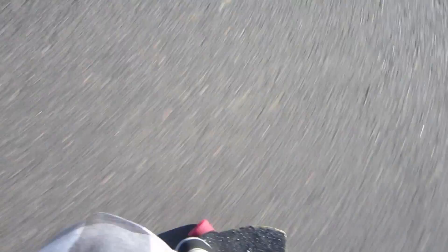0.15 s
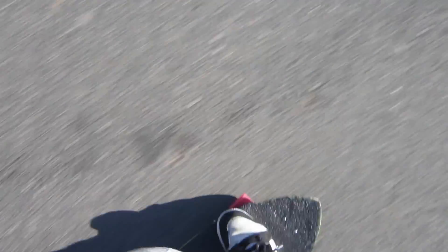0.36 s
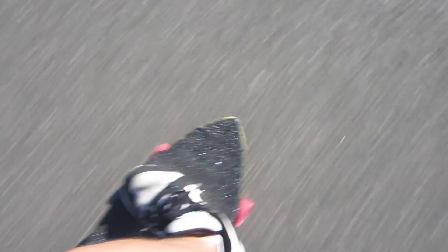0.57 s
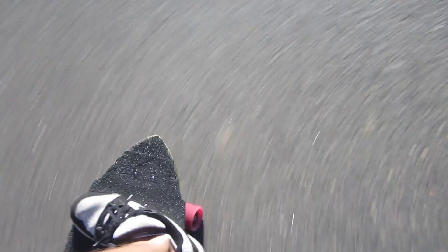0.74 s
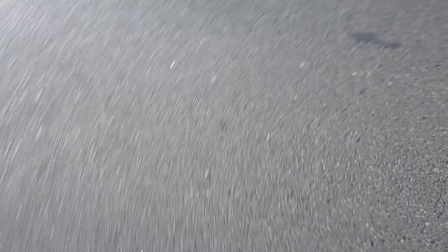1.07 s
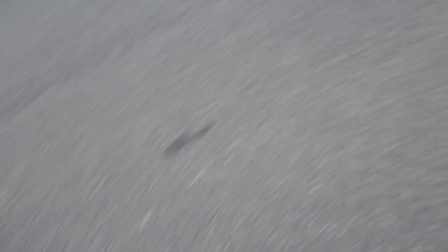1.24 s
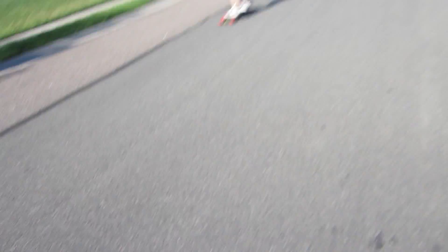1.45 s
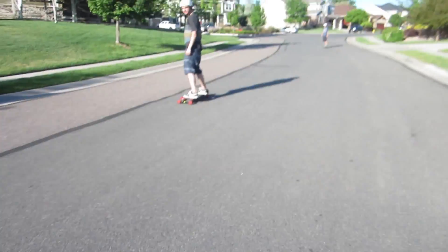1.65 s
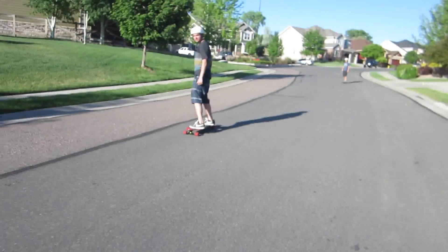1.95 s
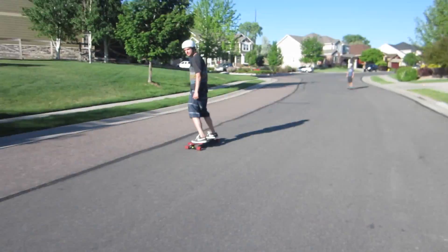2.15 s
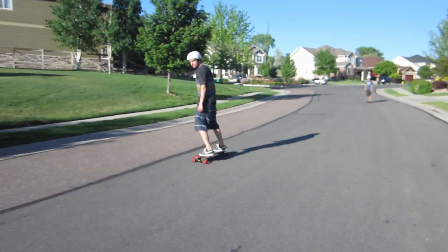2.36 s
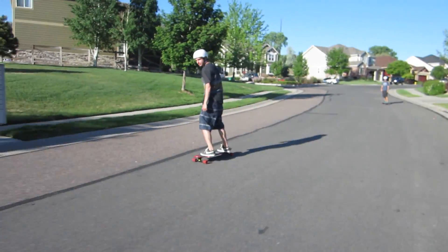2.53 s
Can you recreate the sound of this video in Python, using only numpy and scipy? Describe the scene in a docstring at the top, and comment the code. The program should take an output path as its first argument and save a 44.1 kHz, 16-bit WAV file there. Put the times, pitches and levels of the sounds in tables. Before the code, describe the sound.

Longboard wheels rumble and clatter close over rough asphalt, then roll on quieter and farther away

```python
"""Rough asphalt, outdoors: a longboard carves just under the microphone of a hand-held camera. Random stone
impacts ring wheels and deck, and filtered grit impacts crackle as the wheels scrub sideways. The carve ends at
about 1.2 s; the rolling goes on quieter and farther off, as coloured impacts and hiss. Enveloped tones and
noise make bumps, ticks, creaks, small rattles, a soft rub and a faint high trill. Low noise gusts buffet the
microphone, and short tonal thumps knock the camera housing."""
import sys
import numpy as np
from scipy import signal
from scipy.fft import rfft, irfft
from scipy.io import wavfile
from scipy.ndimage import uniform_filter1d

SR = 44100
rng = np.random.default_rng(int(sys.argv[2]) if len(sys.argv) > 2 else 0)


def transcribe(signal):
    """Save signal, clipped to [-1, 1], as a 16-bit WAV file at the path in sys.argv[1]."""
    frames = np.atleast_2d(signal).T
    limited = np.clip(frames, -1, 1)
    pcm = np.round(limited * 32767).astype(np.int16)
    wavfile.write(sys.argv[1], SR, pcm)


N = 119070  # 2.7 s


def undb(db):
    """Decibels to gain."""
    return 10 ** (np.asarray(db) / 20)


def unit(x):
    """Scale to rms 1."""
    return x / np.sqrt(np.mean(x ** 2))


def seconds():
    """Time of every sample."""
    return np.arange(N) / SR


def curve(rows, axis=1):
    """Gain over time, drawn straight in dB between the points of one column."""
    rows = np.array(rows)
    return undb(np.interp(seconds(), rows[:, 0], rows[:, axis]))


def colour(x, points):
    """Causal minimum-phase filter with the given spectrum, built by folding its cepstrum."""
    hz, db = np.array(points).T
    size = 4096
    f = np.maximum(np.arange(size // 2 + 1) * SR / size, 1)
    gain = undb(np.interp(np.log(f), np.log(hz), db))
    cepstrum = irfft(np.log(gain))
    cepstrum[1:size // 2] *= 2
    cepstrum[size // 2 + 1:] = 0
    response = irfft(np.exp(rfft(cepstrum)))
    return signal.fftconvolve(x, response)[:len(x)]


def ring(x, modes):
    """Sum of resonances, neighbours in opposite phase."""
    out = np.zeros(len(x))
    for k, (hz, width_hz, db) in enumerate(modes):
        b, a = signal.iirpeak(hz, hz / width_hz, SR)
        out += (-1) ** k * undb(db) * signal.lfilter(b, a, x)
    return out


def walk(rate):
    """Smooth random motion with spread 1, from noise averaged twice over 1/rate seconds."""
    k = max(int(SR / rate), 1)
    return unit(uniform_filter1d(uniform_filter1d(rng.standard_normal(N), k), k))


def impacts(rate, spread_db):
    """Random tiny impacts of either sign, a few larger than the rest."""
    hit = rng.random(N) < rate / SR
    size = undb(spread_db * np.minimum(rng.exponential(size=N), 2 * np.e))
    return hit * size * np.sign(rng.standard_normal(N))


def steady(x, size=1800):
    """Hold the slow level of a vibration at rms 1, keeping its fast grain (size in samples)."""
    power = np.abs(uniform_filter1d(uniform_filter1d(x ** 2, size), size))
    return x / np.sqrt(power + 1e-18)


def band(x, lo_hz, hi_hz):
    """Keep one band."""
    return signal.sosfilt(signal.butter(2, [lo_hz, hi_hz], "band", fs=SR, output="sos"), x)


def bursts(rows, points):
    """Short noise crackles that start at once and die away exponentially."""
    t = seconds()
    env = sum(undb(db) * (t >= s) * np.exp(-np.abs(t - s) / decay) for s, db, decay in rows)
    noise = rng.standard_normal(N)
    return colour(noise * env, points) / np.std(colour(noise, points))


def narrow(hz, width_hz):
    """Noise in one resonance whose centre may move: slow noise carried on a tone."""
    lowpass = signal.butter(2, width_hz / 2, fs=SR, output="sos")
    slow = signal.sosfilt(lowpass, rng.standard_normal((2, N)))
    phase = 2 * np.pi * np.cumsum(hz * np.ones(N)) / SR
    return unit(slow[0] * np.cos(phase) + slow[1] * np.sin(phase))


def knocks(rows):
    """Each blow is a tone that swells and dies within a few cycles."""
    out, t = np.zeros(N), np.arange(SR // 10) / SR
    for s, db, hz, rise in rows:
        i = int(s * SR)
        swell = (t / rise * np.exp(1 - t / rise)) ** 2
        out[i:i + len(t)] += undb(db) * swell * np.sin(2 * np.pi * hz * t)
    return out


STONES_PER_S, STONE_SPREAD_DB = 1600, 1


def road(judder):
    """Stones in the asphalt strike at random, their force shaken by the judder of the contact."""
    return impacts(STONES_PER_S, STONE_SPREAD_DB) * judder


# resonances of wheels and trucks: pitch_hz [Hz], width_hz [Hz], relative_db [dB]
WHEEL_MODES = [(532.4, 33.6, 0.5), (597, 83, -4.5), (667, 115, -7.5), (790, 103, -9.5), (932, 91, -14),
               (1073, 55, -14), (1190, 150, -21), (1540, 90, -20)]
# broad spectrum of the wheel roar: pitch_hz [Hz], relative_db [dB per Hz]
WHEEL_ROAR_COLOUR = [(100, -50.5), (330, -13.5), (500, 6), (700, -1), (950, -11.5), (1300, -28.5),
                     (1800, -26), (3000, -46), (8000, -65), (16000, -83)]
# roar against the narrow resonances: time_s [s], relative_db [dB]
ROAR_SHARE = [(0, 11), (.6, -2.5), (1.15, -1.5)]


def wheels(judder):
    """Stones excite narrow wheel and truck resonances and a broad roar, together held at rms 1."""
    rings = band(ring(road(judder), WHEEL_MODES), 438, 1255)
    roar = colour(road(judder), WHEEL_ROAR_COLOUR)
    return steady(unit(rings) + curve(ROAR_SHARE) * unit(roar), size=700)


# resonances of the deck: pitch_hz [Hz], width_hz [Hz], relative_db [dB]
DECK_MODES = [(191, 225, -8), (260, 24.6, 5), (308, 17.6, -1), (408.4, 40, -1)]


def deck(judder):
    """Stones drum the low resonances of the deck, held at rms 1."""
    return steady(band(ring(road(judder), DECK_MODES), 150, 700))


# spectrum of grit under the wheels: pitch_hz [Hz], relative_db [dB per Hz]
GRIT_COLOUR = [(400, -36), (1200, 10), (1800, -5.5), (2400, 6.5), (3000, -2.5), (3600, 4), (4200, -5.5),
               (4700, 2), (5500, -4.5), (6600, 0.5), (8500, -3.5), (12800, -8.5), (15500, -21)]
GRIT_PER_S, GRIT_SPREAD_DB, GRIT_FLICKER_DB = 17000, 4, 2.8


def grit():
    """Dense, flickering grit impacts crackle at rms 1."""
    flicker = undb(GRIT_FLICKER_DB * walk(150))
    return steady(colour(impacts(GRIT_PER_S, GRIT_SPREAD_DB) * flicker, GRIT_COLOUR), size=900)


# rolling just under the microphone: time_s [s], wheel_level_db [dB], deck_level_db [dB]
CLOSE_LEVELS = [(0.0, -33.5, -29), (0.142, -29, -32.5), (0.168, -26.5, -27), (0.552, -27, -26),
                (0.564, -22, -26.5), (0.604, -25, -24), (0.632, -25.5, -34), (0.682, -19, -24),
                (0.735, -24, -26), (0.765, -19.5, -26.5), (0.848, -18.5, -25.5), (0.858, -25.5, -22),
                (0.88, -17.5, -30.5), (0.91, -25, -30.5), (0.957, -17.5, -30), (0.979, -27, -36),
                (1.0, -21.5, -37.5), (1.036, -24.5, -39), (1.1, -22.5, -44.5), (1.135, -23.5, -44),
                (1.149, -35.5, -59), (1.166, -30, -37), (1.202, -51, -54), (1.22, -50, -46.5)]
# sideways scrub of the wheels: time_s [s], level_db [dB]
SCRUB_LEVELS = [(0, -60), (.5, -58.5), (.58, -46), (.67, -40.5), (.76, -38.5), (.82, -33.5), (.89, -37.5),
                (.93, -39.5), (1.05, -44.5), (1.13, -42), (1.17, -50), (1.2, -63)]
JUDDER_HZ, JUDDER_DB = 73.5, 2  # averaging rate and spread of the random judder


def close_board():
    """Wheels, deck and scrubbed grit close by, faded out after the carve."""
    judder = undb(JUDDER_DB * walk(JUDDER_HZ))
    rolling = wheels(judder) * curve(CLOSE_LEVELS) + deck(judder) * curve(CLOSE_LEVELS, axis=2)
    scrub = grit() * curve(SCRUB_LEVELS)
    carving = np.clip((CLOSE_LEVELS[-1][0] - seconds()) / 0.057 + 1, 0, 1)
    return carving * (rolling + scrub)


# wheels strike larger stones: start_s [s], peak_db [dB], pitch_hz [Hz], rise_s [s]
BUMPS = [(.174, -16.5, 510, 0.0054), (.288, -19, 325, 0.0021), (.334, -17.5, 482, 0.0072),
         (.358, -11.5, 407, 0.0013), (.447, -15, 260, 0.0028), (.455, -16, 360, 0.004),
         (.562, -19, 536, 0.0039), (.635, -13.5, 590, 0.0023), (.659, -16, 547, 0.0087),
         (.747, -14, 605, .004), (.818, -21, 560, 0.0036), (.84, -20, 608, 0.0045),
         (.897, -11.5, 507, 0.0015), (.914, -7.5, 580, 0.0022), (.921, -7.5, 575, 0.0015),
         (.9645, -6.5, 785, 0.0014), (.984, -16.5, 599, 0.0046), (1.028, -17, 690, 0.0026),
         (1.068, -12.5, 603, 0.002), (1.115, -13.5, 600, 0.0031), (1.126, -19, 704, 0.0019),
         (1.154, -18.5, 744, 0.0025), (1.165, -25.5, 390, 0.0053), (1.531, -19, 513, 0.0033),
         (1.576, -22, 520, 0.0027), (1.644, -23.5, 487, 0.0036), (1.754, -24, 257, 0.0055),
         (1.773, -19, 400, 0.0062), (1.799, -23, 251, 0.0059), (1.915, -35, 527, 0.0034),
         (1.951, -27.5, 556, 0.0054)]
# spectrum of the crunch under a wheel: pitch_hz [Hz], relative_db [dB per Hz]
CRUNCH_COLOUR = [(200, -18), (700, -4.5), (1050, 4), (1500, -23), (3000, -29), (8000, -24), (15000, -55)]
CRUNCH_BELOW_KNOCK_DB, CRUNCH_DECAY_S = -24.5, 0.003


def bumps():
    """A larger stone crunches under the wheel and knocks the board."""
    contacts = [(s, db + CRUNCH_BELOW_KNOCK_DB, CRUNCH_DECAY_S) for s, db, _, _ in BUMPS]
    return knocks(BUMPS) + bursts(contacts, CRUNCH_COLOUR)


# quieter rolling, farther off: time_s [s], level_db [dB]
FAR_LEVELS = [(1.15, -66), (1.23, -60), (1.29, -37), (1.33, -44.5), (1.39, -39.5), (1.5, -40), (1.56, -34),
              (1.8, -30), (1.95, -37), (2.1, -37.5), (2.35, -35.5), (2.7, -32.5)]
# its spectrum: pitch_hz [Hz], relative_db [dB per Hz]
FAR_COLOUR = [(40, -7), (120, -9), (200, -1), (255, 0.5), (320, -6.5), (420, 0), (480, -3.5), (530, 3.5),
              (650, -7), (800, -13), (1100, -23), (2000, -39), (6000, -68), (16000, -82)]


def far_rolling():
    """The duller, smoother hum of wheels running straight, from dense coloured impacts."""
    begun = np.clip((seconds() - FAR_LEVELS[0][0]) / 0.038, 0, 1)
    return begun * curve(FAR_LEVELS) * steady(colour(impacts(rate=2500, spread_db=2.5), FAR_COLOUR))


# grit snaps and small ticks: start_s [s], body_level_db [dB], snap_level_db [dB], decay_s [s]
TICKS = [(0.326, -36, -45, .004), (0.614, -52, -40, .002), (0.667, -52, -33.5, 0.0055),
         (.797, -28, -34, 0.0045), (.804, -27, -32, 0.0016), (.822, -31, -42, .006),
         (0.841, -27.5, -38, 0.0092), (.878, -44, -28.5, 0.0012), (.898, -34, -35, 0.0024),
         (.906, -43, -27.5, 0.0014), (0.92, -26, -50, 0.0054), (0.964, -26, -35, 0.0023),
         (1.002, -28.5, -41, 0.0032), (1.014, -43, -35, 0.0018), (1.028, -31, -42, 0.0022),
         (1.122, -32.5, -44, 0.0042), (1.157, -36.5, -55, 0.0055), (1.269, -38.5, -58, .003),
         (1.28, -41, -59, 0.0037), (1.301, -42.5, -59, .003), (1.365, -37, -54, 0.004),
         (1.771, -43, -37.5, 0.00097), (1.798, -44, -50, .004), (1.913, -57, -53, 0.016),
         (2.154, -57, -35, 0.00041)]
# spectrum of a tick's body: pitch_hz [Hz], relative_db [dB per Hz]
TICK_COLOUR = [(300, -29), (1200, 15.5), (1900, 10), (3000, 2), (4200, 6.5), (5500, -1.5), (8000, -17),
               (15500, -40)]
# spectrum of its bright snap: pitch_hz [Hz], relative_db [dB per Hz]
SNAP_COLOUR = [(1000, -31), (4000, 4), (6500, 6), (10000, 4), (13000, 0), (15500, -21)]


def ticks():
    """Grit ticks with a body and a bright snap."""
    body = bursts([(s, db, decay) for s, db, _, decay in TICKS], TICK_COLOUR)
    snap = bursts([(s, db, decay) for s, _, db, decay in TICKS], SNAP_COLOUR)
    return body + snap


# short dry creaks close to the microphone: start_s [s], level_db [dB], decay_s [s], pitch_hz [Hz]
CREAKS = [(.327, -32.5, 0.0022, 2600), (.387, -38, .005, 1800), (0.403, -44, 0.0042, 1850),
          (.44, -38, 0.005, 2000), (.455, -32.5, 0.0051, 2050), (.469, -39, 0.0087, 1900),
          (.481, -24.5, .0035, 1550), (0.492, -35, 0.0055, 1493), (.502, -34, 0.0089, 1460),
          (0.51, -38, 0.0091, 1640), (1.581, -46, 0.0065, 1450), (1.62, -43.5, .01, 1500),
          (1.646, -39, .004, 1500), (1.763, -36.5, 0.0036, 1550), (1.818, -36, 0.0055, 1200),
          (1.844, -43, .005, 996), (1.918, -41, .005, 1050)]
# spectrum of the scrape in a creak: pitch_hz [Hz], relative_db [dB per Hz]
SCRAPE_COLOUR = [(300, 6), (900, 21), (1400, 3), (2200, -8), (3000, 5), (4000, -20), (8000, -10),
                 (15000, -53)]
CREAK_WIDTH_HZ, CREAK_RISE_S, SCRAPE_RELATIVE_DB = 510, 0.0011, -3


def creaks():
    """Each short slip rings at its own pitch over a dry scrape."""
    t = seconds()
    rings = np.zeros(N)
    for s, db, decay, hz in CREAKS:
        rise = np.clip((t - s) / CREAK_RISE_S, 0, 1)
        slip = rise * np.exp(-np.abs(t - s - CREAK_RISE_S) / decay)
        rings += undb(db) * slip * steady(narrow(hz, CREAK_WIDTH_HZ), size=200)
    scrape = bursts([row[:3] for row in CREAKS], SCRAPE_COLOUR)
    return rings + undb(SCRAPE_RELATIVE_DB) * scrape


# loose hardware clacks: start_s [s], level_db [dB]
CLACKS = [(1.668, -34), (1.6812, -26.5), (1.6877, -28), (1.6952, -20)]
# spectrum of a clack: pitch_hz [Hz], relative_db [dB per Hz]
CLACK_COLOUR = [(400, -4), (1000, 4), (1400, 10), (2800, -2), (3400, -10), (7500, -11), (9500, -17),
                (11000, -4), (12800, -17), (14000, -33), (16000, -38)]
# resonances of the hardware: pitch_hz [Hz], width_hz [Hz], relative_db [dB]
CLACK_MODES = [(840, 130, 0), (1290, 78, 3), (1561, 89, -1.5), (2010, 190, -5), (2220, 280, -2),
               (2850, 110, -8)]
CLACK_DECAY_S, BOUNCE_DELAY_S, BOUNCE_RELATIVE_DB, CLACK_RING_GAIN_DB = 0.00043, 0.0013, -6, 28.5


def clacks():
    """Loose hardware strikes, rings briefly and bounces once."""
    blows, contacts = np.zeros(N), []
    for s, db in CLACKS:
        blows[int(s * SR)] = undb(db)
        contacts.append((s, db, CLACK_DECAY_S))
        contacts.append((s + BOUNCE_DELAY_S, db + BOUNCE_RELATIVE_DB, CLACK_DECAY_S))
    return bursts(contacts, CLACK_COLOUR) + undb(CLACK_RING_GAIN_DB) * ring(blows, CLACK_MODES)


# resonances of a soft rub at its height: pitch_hz [Hz], width_hz [Hz], level_db [dB]
RUB_MODES = [(1600, 180, -56.5), (2000, 280, -59.5), (2250, 300, -57.5)]
RUB_MIDDLE_S, RUB_HALF_S, RUB_FALL_OCT_PER_S = 1.49, 0.12, 0.66


def rub():
    """A soft rubbing sound comes and goes while its resonances sink."""
    t = seconds() - RUB_MIDDLE_S
    sink = 2 ** (-RUB_FALL_OCT_PER_S * t)
    tones = sum(undb(db) * narrow(hz * sink, width) for hz, width, db in RUB_MODES)
    return np.exp(-(t / RUB_HALF_S) ** 2) * tones


CHIRP_HZ, CHIRP_WANDER_HZ = 6150, 70
CHIRP_DB, CHIRP_MIDDLE_S, CHIRP_HALF_S = -55.5, 1.25, 0.11
CHIRPS_PER_S, CHIRP_JITTER, CHIRP_SPREAD_DB = 93, 0.14, 4  # jitter is a fraction of the rate
CHIRP_SHARPNESS = 5.1  # power that narrows each pulse


def chirps():
    """A faint high whistle, broken into a quick uneven trill, as the board leaves the carve."""
    held = np.exp(-((seconds() - CHIRP_MIDDLE_S) / CHIRP_HALF_S) ** 8)
    turns = np.cumsum(CHIRPS_PER_S * (1 + CHIRP_JITTER * walk(60))) / SR
    pulses = np.abs(np.sin(np.pi * turns)) ** CHIRP_SHARPNESS
    uneven = undb(CHIRP_SPREAD_DB * walk(80))
    tone = np.sin(2 * np.pi * np.cumsum(CHIRP_HZ + CHIRP_WANDER_HZ * walk(138)) / SR)
    return undb(CHIRP_DB) * held * pulses * uneven * tone


# fine hiss of the wheels close by: time_s [s], level_db [dB]
CLOSE_HISS_LEVELS = [(0, -52), (.15, -47), (.32, -43.5), (.42, -47.5), (.52, -49), (.7, -40), (1.1, -71),
                     (1.2, -78)]
# its spectrum: pitch_hz [Hz], relative_db [dB per Hz]
CLOSE_HISS_COLOUR = [(300, -2), (1500, 5.5), (2300, 2), (3300, -1.5), (4500, 0), (7500, -4.5), (9000, -9.5),
                     (10500, -11), (12000, -21), (15500, -30)]
# hiss of wheels and air farther off: time_s [s], level_db [dB]
FAR_HISS_LEVELS = [(1.1, -73), (1.2, -54.5), (1.33, -53.5), (1.48, -50), (1.8, -48.5), (2.1, -50.5),
                   (2.38, -49.5), (2.55, -46), (2.7, -45)]
# its spectrum: pitch_hz [Hz], relative_db [dB per Hz]
FAR_HISS_COLOUR = [(300, 4), (1300, -3), (2000, 2), (2900, -4), (4800, -6), (7000, -12), (10000, -19),
                   (12500, -24.5), (15500, -39)]
HISS_FLICKER_DB = 1.14


def hiss():
    """Fine hiss of wheels and passing air: flickering noise, brighter close by."""
    def noise():
        return rng.standard_normal(N) * undb(HISS_FLICKER_DB * walk(96))
    close = curve(CLOSE_HISS_LEVELS) * unit(colour(noise(), CLOSE_HISS_COLOUR))
    far = curve(FAR_HISS_LEVELS) * unit(colour(noise(), FAR_HISS_COLOUR))
    return close + far


# low thumps on the camera housing: start_s [s], peak_db [dB], pitch_hz [Hz], rise_s [s]
THUMPS = [(1.699, -20, 96, 0.011), (1.724, -20.5, 225, 0.0064), (1.817, -23, 100, 0.0097),
          (1.841, -26, 154, .005), (1.888, -24, 137, 0.016), (1.909, -20, 100, 0.013)]


def thumps():
    """Knocks on the camera housing thump as short low tones."""
    return knocks(THUMPS)


# light breeze on the microphone: time_s [s], level_db [dB]
BREEZE_LEVELS = [(0, -58), (.17, -38.5), (.7, -43.5), (.95, -44), (1.1, -58.5), (1.25, -50.5), (1.45, -44),
                 (2.7, -56)]
# separate gusts on the microphone: middle_s [s], half_length_s [s], level_db [dB]
GUSTS = [(0.33, 0.071, -27.5), (0.468, 0.027, -27.5), (0.507, 0.029, -29), (1.42, 0.042, -48),
         (1.6, 0.092, -39.5), (1.697, 0.024, -29), (1.835, 0.071, -31), (1.921, 0.028, -27.5),
         (2.002, 0.037, -28.5), (2.209, 0.021, -37), (2.458, 0.043, -34.5)]
# spectrum of the buffeting: pitch_hz [Hz], relative_db [dB per Hz]
WIND_COLOUR = [(15, -16), (45, -2.5), (80, -5), (110, 0.5), (150, -3.5), (200, -3), (400, -18), (1000, -29),
               (3000, -63), (16000, -66)]


def wind():
    """Low noise buffets the microphone: a light breeze and separate gusts."""
    t = seconds()
    gusts = sum(undb(db) * np.exp(-((t - s) / half) ** 2) for s, half, db in GUSTS)
    return (curve(BREEZE_LEVELS) + gusts) * steady(colour(rng.standard_normal(N), WIND_COLOUR))


def scene():
    """All sources at the one microphone."""
    board = close_board() + bumps() + far_rolling()
    details = ticks() + creaks() + clacks() + rub() + chirps()
    air = hiss() + thumps() + wind()
    return (board + details + air)[None]


def record(dry):
    """The camera cuts the top, steeply above 15750 Hz."""
    return signal.sosfilt(signal.ellip(10, 0.2, 80, 15750, fs=SR, output="sos"), dry)


dry = scene()
out = record(dry)
transcribe(out)
```